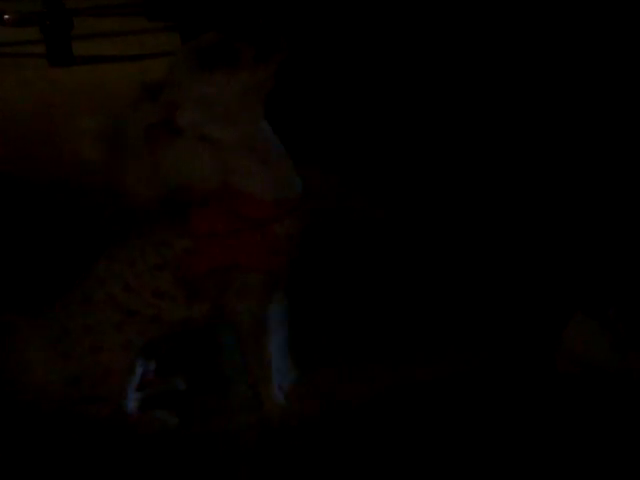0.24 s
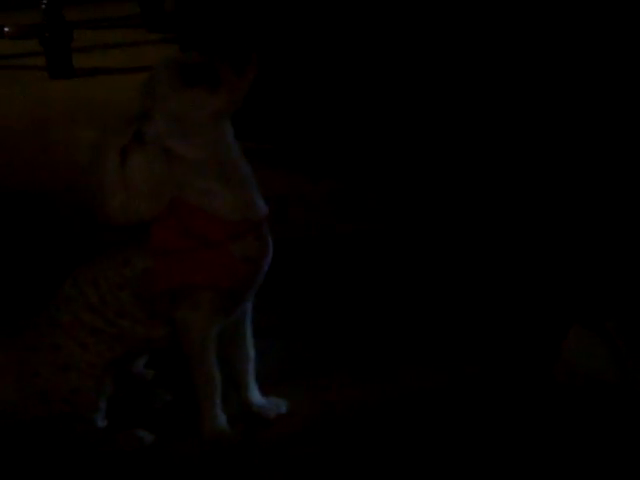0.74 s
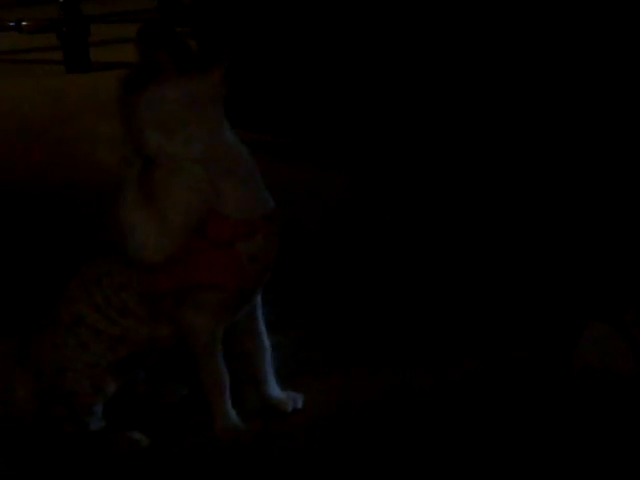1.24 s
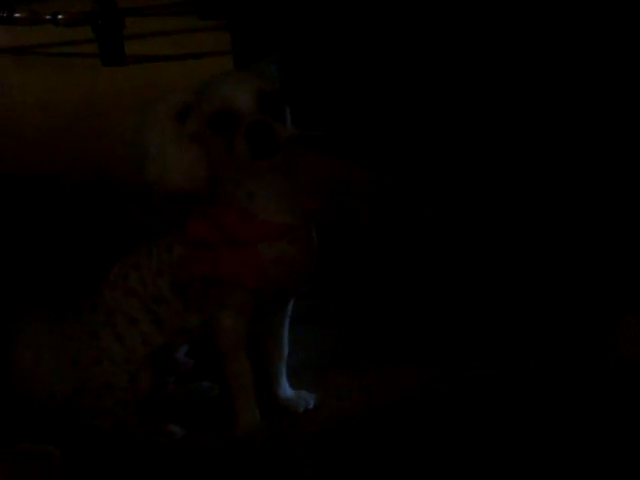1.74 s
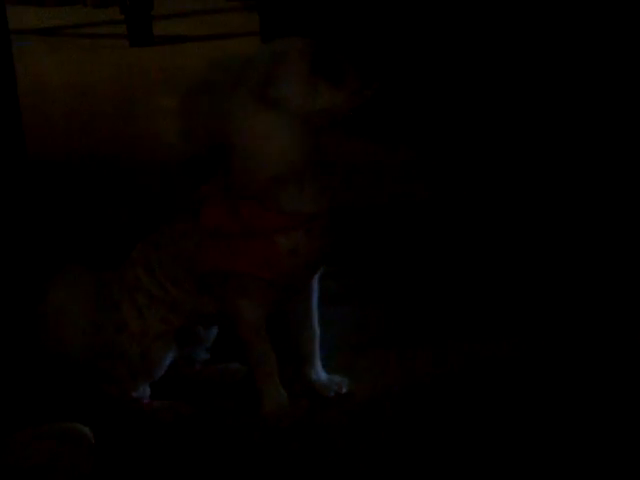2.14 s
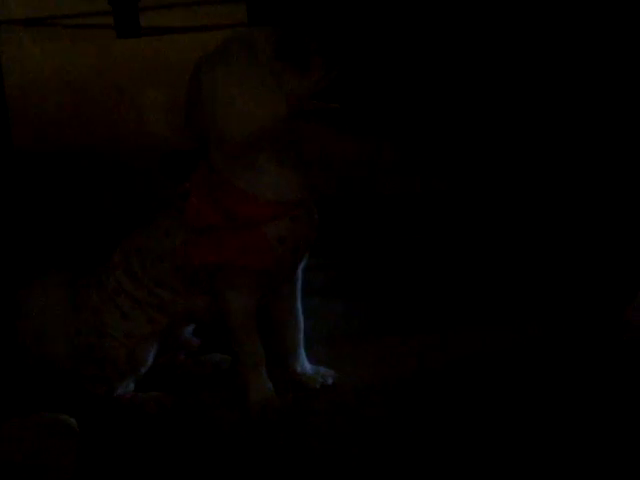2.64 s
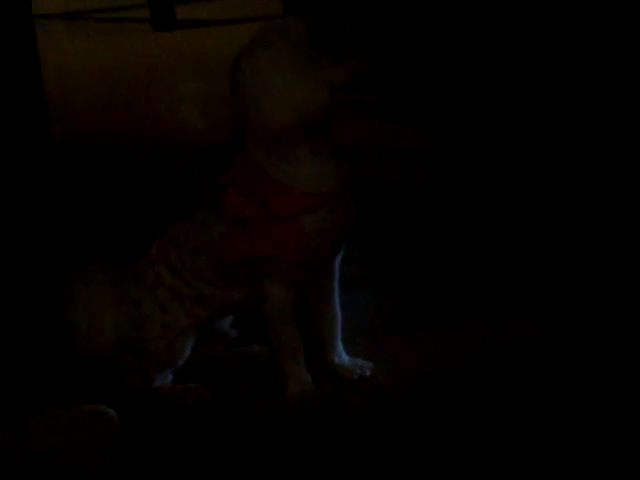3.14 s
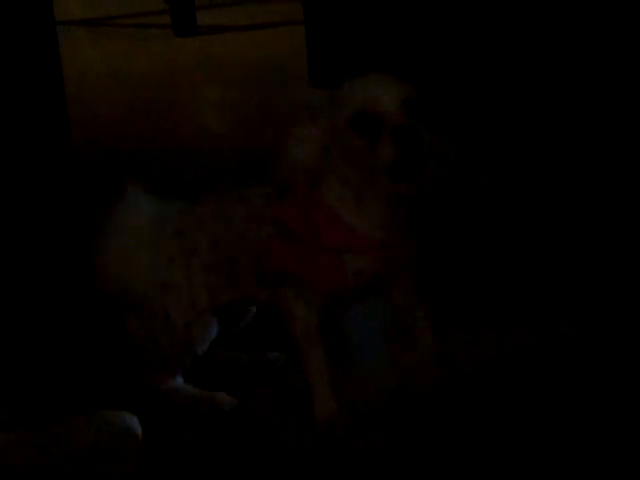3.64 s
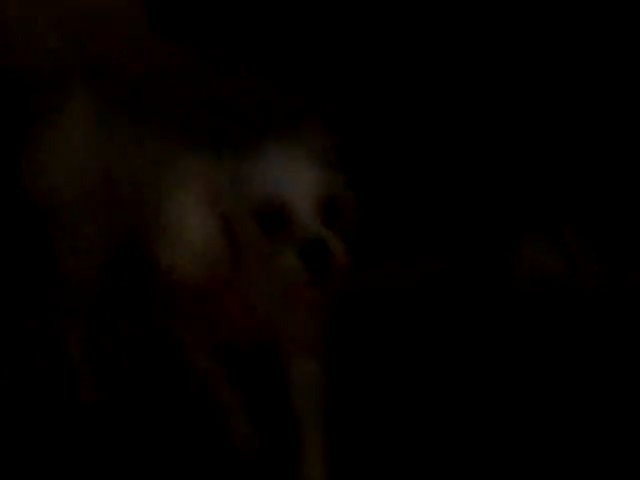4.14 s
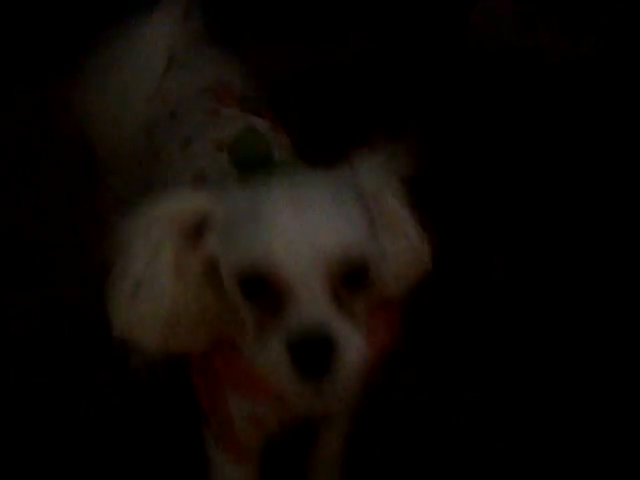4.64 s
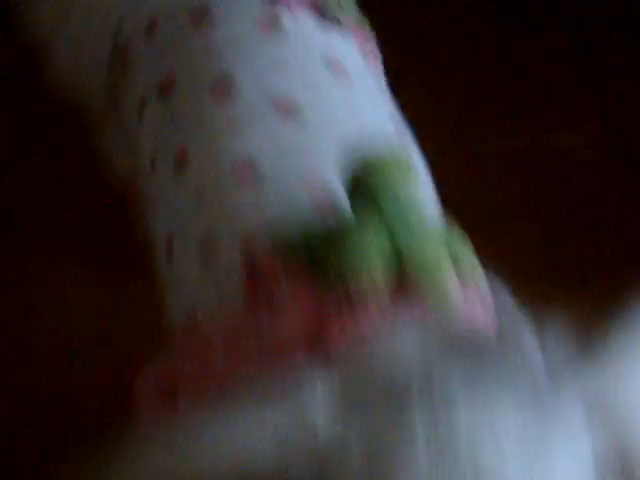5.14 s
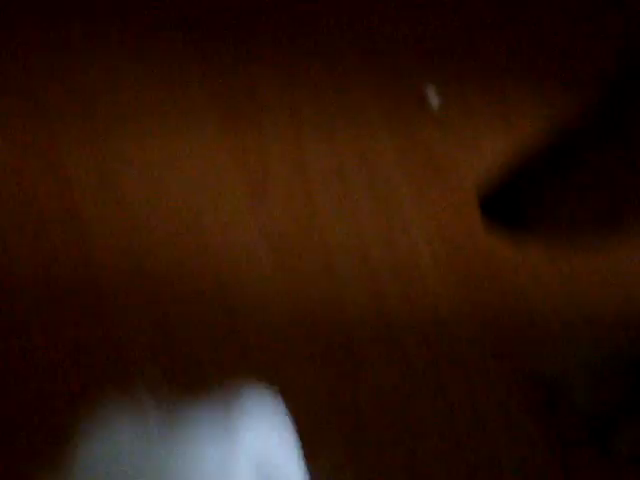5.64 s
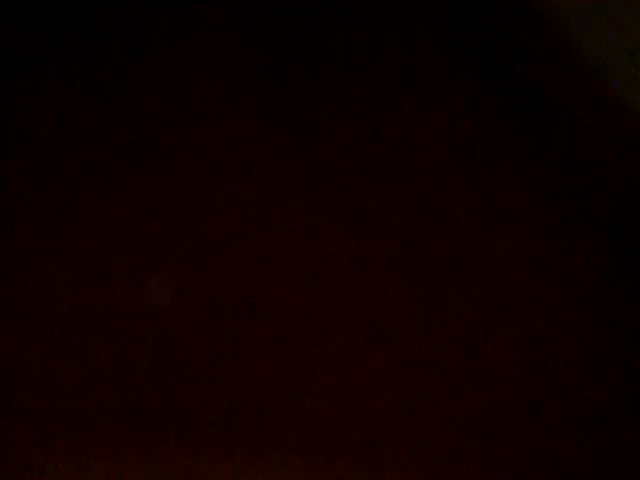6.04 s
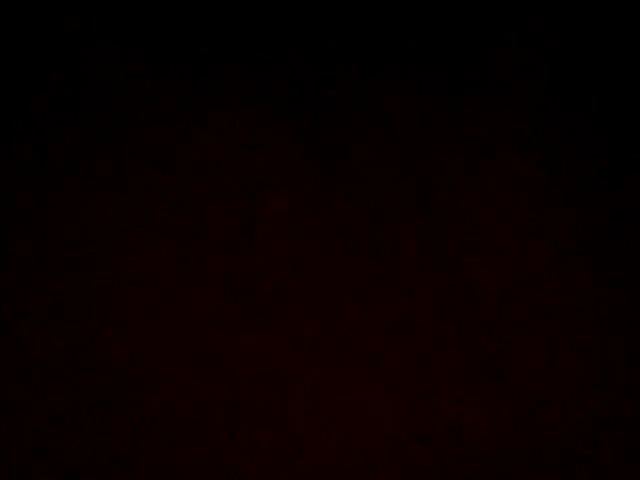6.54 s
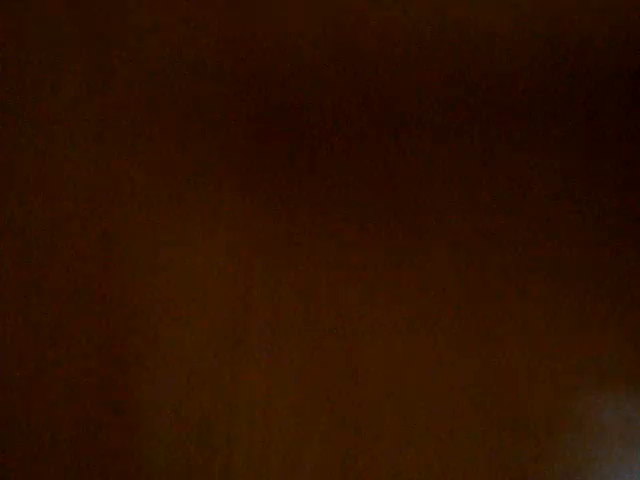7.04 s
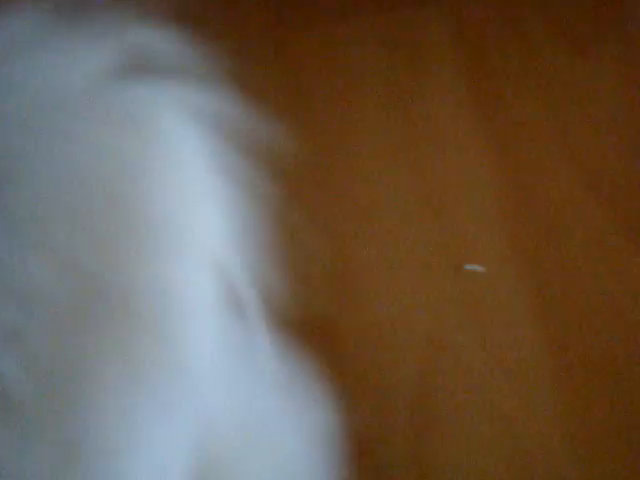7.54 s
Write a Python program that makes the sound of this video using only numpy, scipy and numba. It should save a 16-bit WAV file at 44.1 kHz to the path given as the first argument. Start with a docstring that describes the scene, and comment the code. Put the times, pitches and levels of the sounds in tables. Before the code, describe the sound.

A small dog gives sharp high yips and thin whines in an echoing hard-floored room, then trots close, claws clicking, panting lightly.

```python
"""A small dog yips and whines in a hard-floored room, then trots up to a phone, claws ticking, and pants.
Cries are gliding harmonics plus breath noise, at times period-doubled; claws are ringing spikes with a scuff.
Pants are puffs of shaped noise; decaying noise bands form the room's echo, over a murmur and a swelling rumble.
The phone's gain control ducks on loud cries and creeps back, so the room's murmur sinks and swells."""
import sys
import numpy as np
from scipy import signal
from scipy.fft import rfft, irfft, next_fast_len
from scipy.io import wavfile
from scipy.ndimage import uniform_filter1d, minimum_filter1d
from numba import njit

SR = 44100
rng = np.random.default_rng(int(sys.argv[2]) if len(sys.argv) > 2 else 0)


def generate_wav(sig):
    """Save sig (samples, or channels by samples) to the path in sys.argv[1] as 16-bit PCM at SR."""
    pcm = np.round(np.clip(np.atleast_2d(sig).T, -1, 1) * 32767).astype(np.int16)
    wavfile.write(sys.argv[1], SR, pcm)


N = 343965
LEAD = int(.4 * SR)  # samples ahead of the start, so that an earlier note can still echo
MIC_TOP_HZ = 10000


def undb(db):
    """Decibels to amplitude gain."""
    return 10 ** (np.asarray(db) / 20)


def at(points, hz):
    """Interpolate (f/Hz, value) points on a log-frequency axis."""
    f, v = np.transpose(points)
    return np.interp(np.log(np.maximum(hz, 1)), np.log(f), v)


def noise(n, points, slope_db=0):
    """Noise of rms 1 coloured by (f/Hz, level/dB) points, tilted by slope_db per octave about 2 kHz."""
    m = next_fast_len(n)
    hz = np.arange(m // 2 + 1) * SR / m
    colour_db = at(points, hz) + slope_db * np.log2((hz + 50) / 2000)
    x = irfft(rfft(rng.standard_normal(m)) * undb(colour_db), m)[:n]
    return x / np.std(x)


def add(track, s, x):
    """Mix x into the track from time s on."""
    i = LEAD + int(s * SR)
    track[i:i + len(x)] += x[:len(track) - i]


def murmur():
    """Steady house noise with a fixed spectrum."""
    # spectrum: f/Hz, density/dB (relative)
    spectrum = [(24, -40), (40, -12.5), (124, -11.5), (254, 3), (597, -0.5), (670, 1.5), (3300, -16.5),
                (4350, -12), (8910, -23.5), (10000, -26), (13000, -49), (22000, -120)]
    return undb(-49.5) * noise(N, spectrum)


def rumble():
    """Low noise that swells for a while."""
    # spectrum: f/Hz, level/dB (relative)
    spectrum = [(20, -12), (60, -7), (110, -17.5), (175, 8), (260, -9.5), (500, -27.5)]
    # swell: t/s, level/dB
    swell = [(0, -77), (2.3, -71), (2.702, -61.5), (3.5, -60), (4.2, -64), (4.599, -80), (7.8, -68)]
    level_db = np.interp(np.arange(N) / SR, *np.transpose(swell))
    return undb(level_db) * noise(N, spectrum)


def room(x):
    """Echoes that arrive after a gap, thicken, and die band by band."""
    # decay time to -60 dB: f/Hz, T60/s
    decay = [(250, 0.13), (700, 0.37), (1300, 0.36), (3000, 0.27), (6000, 0.37), (10000, 0.38)]
    gap_s, build_s = 0.0038, 0.029
    early_db, early_s = 4, .03  # first reflections stand above the later tail
    t = np.arange(int(.7 * SR)) / SR
    tail = 0
    for hz in 160 * 2. ** np.arange(7):
        band = noise(len(t), [(hz / 2, -40), (hz / 1.47, 0), (hz * 1.2, 0), (hz * 2, -40)])
        tail = tail + band * np.sqrt(hz) * undb(-60 * t / at(decay, hz))
    build = np.clip((t - gap_s) / build_s, 0, 1)
    tail = tail * build * undb(early_db * np.exp(-(t / early_s) ** 2))
    tail = tail / np.sqrt(np.sum(tail ** 2))
    return signal.fftconvolve(x, tail)[:len(x)]


def pant(db, length_s, slope_db):
    """A puff of air through the open mouth: noise under a Gaussian envelope."""
    # mouth colour: f/Hz, level/dB
    mouth_colour = [(300, -16.5), (1000, 11.5), (2000, 2.5), (3500, -2.5), (6000, -7), (10000, -19)]
    t = np.arange(-length_s, length_s, 1 / SR)
    return undb(db) * np.exp(-(2 * t / length_s) ** 2) * noise(len(t), mouth_colour, slope_db)


def claw(db, hz):
    """A nail's tick: a sharp spike that rings at its centre, with a short broad scuff."""
    spike_t60_s, scuff_t60_s, scuff_attack_s = 0.00072, 0.037, 0.0001
    t = np.arange(int(.06 * SR)) / SR
    spike = np.sin(2 * np.pi * hz * t) * undb(-60 * t / spike_t60_s)
    scuff = noise(len(t), [(hz / 8, -25), (hz / 2, -6), (hz, 0), (hz * 2, -6), (hz * 8, -15)])
    scuff = scuff * undb(-60 * t / scuff_t60_s) * np.minimum(t / scuff_attack_s, 1)
    return undb(db) * (spike + 0.43 * scuff)


def note(rows, attack_s, mouth, slope_db, breath_from_db, breath_to_db, half_from_db, half_to_db, buzz_db):
    """Vocal-fold harmonics and sub-lines through throat and nose; the breathier, the more lines tremble."""
    # mouth open: f/Hz, level/dB
    throat = [(200, -23), (500, -21), (1300, 5), (1900, -4.5), (2300, -4.5), (3000, 4), (3600, -4.5),
              (4200, 1.5), (4800, -14), (7000, -28), (9700, -32.5)]
    # mouth shut: f/Hz, level/dB
    nose = [(200, -20), (500, 0), (1250, 2), (1750, -13), (2400, -27), (3000, -9), (3700, -15), (4600, -30),
            (5400, -21), (6100, -32), (7500, -9), (8600, -17), (10000, -16)]
    # breath colour: f/Hz, level/dB
    breath_colour = [(300, -56.5), (800, -19.5), (1300, -4.5), (2200, -5.5), (3100, -0.5), (4200, -8.5),
                     (5000, -18), (7000, -11), (10000, -10)]
    wobble = [(20, -3.5), (200, 4.5), (600, -36.5)]  # spectrum of jitter and shimmer: f/Hz, level/dB
    jitter, shimmer = 0.064, 0.4  # pitch and level tremble per unit of breath gain
    attack_from_db, edge_s = -24, 0.002  # attack starts below the first level; fade at both ends
    strain_slope_db, strain_breath_db = 14.5, 8  # what full strain adds: dB per octave, dB
    rasp_db, rasp_s = 8, .015  # the folds leak air until they settle
    under_db = -18  # the open mouth radiates little below the pitch

    s, *columns = np.transpose(rows)
    t = np.arange(s[0] - attack_s, s[-1], 1 / SR)
    n = len(t)
    hz, db, strain = (np.interp(t, s, c) for c in columns)
    db = db + attack_from_db * np.maximum(s[0] - t, 0) / attack_s
    slope_db = slope_db + strain_slope_db * strain
    breath_db = np.linspace(breath_from_db, breath_to_db, n) + strain_breath_db * strain
    breath_db = breath_db + rasp_db * np.exp(-(t - t[0]) / rasp_s)
    breath_gain = undb(breath_db)
    half_db = np.linspace(half_from_db, half_to_db, n)
    mouth = np.clip(mouth, 0, 1)
    quarter_db = -9 - 50 * (1 - mouth)  # whines with the mouth shut run more evenly
    buzz = undb(buzz_db + db - np.max(db))  # the snap fades faster than the cry as it grows quieter

    phase = 2 * np.pi * np.cumsum(hz * (1 + (.004 + jitter * breath_gain) * noise(n, wobble))) / SR
    voice = 0
    for k in np.arange(.5, 18, .25):  # multiples of the pitch
        folds = undb(slope_db * np.log2(max(k, 1))) + buzz
        tract_db = mouth * at(throat, k * hz) + (1 - mouth) * at(nose, k * hz)
        # every second and fourth cycle differs a little
        sub_db = (half_db if k % 1 else 0) + (quarter_db if k % .5 else 0) + (under_db if k < 1 else 0)
        line = folds * undb(tract_db + sub_db) * (k * hz < MIC_TOP_HZ)
        if np.max(line) > undb(-66):  # skip faint lines
            tremble = 1 + shimmer * breath_gain * min(k - 1 + 0.067, 2) * noise(n, wobble)
            voice = voice + line * tremble * np.sqrt(2) * np.sin(k * phase + k * k)
    breath = breath_gain * (1 + .5 * np.cos(phase)) * noise(n, breath_colour)  # pulses with the folds
    edge = np.clip(np.minimum(t - t[0], s[-1] - t) / edge_s, 0, 1)
    no_bass = signal.butter(4, .45 * np.min(hz), "high", fs=SR, output="sos")  # a small head radiates none
    return signal.sosfilt(no_bass, undb(db) * edge * (voice + breath))


def scene():
    """Cries, claws and pants, direct and through the room, over murmur and rumble."""
    # panted breaths: middle t/s, level/dB, length/s, brightness/dB per octave
    pants = [(1.211, -45.5, 0.038, 3.5), (3.432, -39.5, 0.053, 0), (4.483, -35.5, 0.029, 12),
             (4.617, -37, 0.11, 7.5), (5.572, -48, 0.041, -4), (5.826, -45.5, 0.14, 9),
             (6.004, -41.5, 0.058, 4.5), (6.362, -38.5, 0.035, 6), (6.514, -45, 0.037, 2.5),
             (6.652, -41.5, 0.028, 2), (6.784, -33, .04, 15), (6.947, -41.5, 0.03, 7)]
    # claws on the floor: t/s, level/dB, centre f/Hz
    claws = [(4.2964, -25.5, 2850), (4.4627, -22.5, 2800), (4.79, -20.5, 4440), (4.952, -22.5, 2630),
             (5.0585, -29.5, 1990), (5.1176, -21, 1950), (5.2757, -19, 2410), (5.4477, -20, 1740),
             (5.566, -31.5, 1830), (5.728, -36, 1850), (5.9661, -19, 5230), (6.082, -35, 5040),
             (6.2242, -33, 1780), (6.2945, -41, 1970), (6.736, -31.5, 6370), (6.8473, -23.5, 1930),
             (6.926, -30, 1460), (7.028, -34, 1900), (7.065, -32, 8100), (7.16, -35.5, 2050),
             (7.2, -33, 1690), (7.56, -44, 4820), (7.7112, -33.5, 1560)]
    # room's share of a tick, which dips sharply around 6 s: t/s, level/dB
    claw_room = [(4.3, -9.5), (5.7, -4), (6, -34), (7.7, -5)]
    # one curve a note; a cry that leaps in pitch or turns to a whine takes several:
    # t/s, pitch f/Hz, level/dB, strain 0-1 (brightens overtones, lets breath through)
    notes = [
        [(-.3, 1240, -33, .3), (-.25, 1257, 3, .3)],
        [(.265, 852.3, -6, 0.84), (.277, 956.4, -3, 0.93), (.287, 1065, -5, 1), (.295, 1163, 4.5, 0.15),
         (.303, 1316, 4, 0.61), (.323, 1259, -5, 0.34), (.338, 1100, -12, 1), (.385, 793, -11, 0),
         (.42, 581, -14.5, 0)],
        [(1.263, 1023, -13, 0.99), (1.27, 1051, 2.5, 0.78), (1.279, 1050, -2, 0.94), (1.286, 1168, 1, 0.6),
         (1.32, 1195, 13.5, 0.2), (1.365, 1216, 10, 0.3)],
        [(1.368, 1484, -2.5, 0.4), (1.385, 1489, 0.5, 0.76), (1.41, 1438, 0.5, 0), (1.425, 1449, 3.5, 0),
         (1.45, 1234, -7.5, 0)],
        [(2.196, 1320, -14.5, 0), (2.204, 1324, -3.5, 0), (2.217, 1304, -6.5, .4), (2.226, 1222, -7.5, 0.76),
         (2.245, 1262, -15, 1), (2.262, 1107, -25, 0.04)],
        [(3.455, 1916, 0.5, 0.36), (3.468, 1774, -9.5, 0.55), (3.488, 1878, -3.5, .15),
         (3.496, 1783, -5.5, 0.37), (3.501, 1258, -17.5, 0), (3.515, 1134, -25, 0.3)],
        [(3.728, 1104, -10.5, 0.4), (3.745, 1219, -9, 0.42), (3.76, 1302, -7.5, 0.91)],
        [(3.763, 1870, -8, .3), (3.77, 2013, -11.5, 0.5), (3.78, 2042, -7, 0.7), (3.8, 1620, -13.5, 0.8),
         (3.82, 1513, -13.5, 0), (3.86, 1320, -22, 0)],
        [(3.858, 1335, -14.5, 0.9), (3.91, 1327, -22.5, .4), (3.95, 1398, -14.5, 1), (4.01, 1449, -13, 0.2),
         (4.07, 1435, -14.5, 0), (4.1, 1407, -16, 0), (4.13, 1415, -12, 0), (4.16, 1386, -13.5, .2),
         (4.195, 1370, -27.5, 0.6), (4.212, 1240, -21, 1)],
        [(4.485, 904, -14, 1), (4.491, 962, -21.5, 1), (4.494, 1064, -5.5, 0.3), (4.519, 1068, -11, 0),
         (4.526, 958, -22, 0.32), (4.555, 949, -20.5, .4), (4.58, 864, -24, 0)],
        [(5.071, 664, -38, .4), (5.08, 596, -34.5, .3), (5.092, 580, -32, .5)],
        [(5.17, 694, -11.5, 0.52), (5.184, 642, -11.5, .4), (5.198, 862, -22, 0), (5.215, 813, -20.5, 0),
         (5.24, 620, -32.5, 0.5)],
        [(7.262, 577.4, -18.5, 0.46), (7.274, 537, -16.5, 0.48), (7.286, 598, -16.5, 0.5),
         (7.302, 605.5, -22.5, .9), (7.345, 563, -17, 0.3), (7.39, 495.3, -24, 0.46), (7.408, 507, -23.5, 0.16),
         (7.43, 524.5, -23, 0.2), (7.452, 606, -20, 0), (7.47, 617, -60, 0.4)],
        [(7.76, 560, -27.5, 0), (7.8, 536, -50, 0.1)],
    ]
    # voice of each note, relaxed, dB re its level: attack/s, mouth open 0-1, overtone slope/dB per octave,
    # breath at start/dB, at end/dB, half-pitch lines at start/dB, at end/dB,
    # flat overtone shelf from the folds snapping shut/dB, room's share/dB
    voices = [(0.0071, 1, -9.5, -24, -23, -35, -42, -44.5, 9),
              (.007, 1, -11.5, -20, -9, -18.5, -18, -41, -5.5),
              (0.004, 0.99, -12.5, -23.5, -16.5, -13.5, -2.5, -34, -4.5),
              (.003, 1, -16.5, -7.5, -21.5, 10.5, -1, -21, -6.5),
              (0.015, 0.87, -23.5, -36, -30.5, -40, -48, -15.5, -7),
              (.005, 0.86, -14, -37.5, -32.5, -49, -41.5, -34, -2),
              (.004, 1, -10, -29, -25.5, -33, -26, -32, -1), (.003, 0.96, -9, -30, -20, -22, -29, -23, -2),
              (.003, .4, -55, -34, -34.5, -41, -45, -15, -7),
              (.004, 1, -18.5, -25, -25.5, -41, -48, -14, -3),
              (0.00296, .05, -42, -46, -45.5, -29, -29.5, -55, -8.5),
              (0.014, 0.33, -18, -37, -32, -28, -40, -53, -9.5),
              (0.012, .05, -14, -25.5, -55, -22.5, -48, -26.5, -16),
              (.015, 0.043, -68, -48, -50, 17, 23, -60, -12)]

    near, walls = np.zeros(N + LEAD), np.zeros(N + LEAD)
    for s, db, length_s, slope_db in pants:
        x = pant(db, length_s, slope_db)
        add(near, s - length_s, x)
        add(walls, s - length_s, x * undb(-18.0))
    for s, db, hz in claws:
        x = claw(db, hz)
        add(near, s, x)
        add(walls, s, x * undb(np.interp(s, *np.transpose(claw_room))))
    for rows, (attack_s, *voice, room_db) in zip(notes, voices):
        x = note(rows, attack_s, *voice)
        start_s = rows[0][0] - attack_s
        add(near, start_s, x)
        add(walls, start_s, x * undb(room_db))
    dog = (near + room(walls))[LEAD:]
    return (dog + murmur() + rumble())[None]


@njit
def ride(x, ceiling, gain, attack, hold, recover):
    """Gain control: falls fast while peaks pass the ceiling, waits, then climbs at a steady dB rate up to 1."""
    out, wait = np.empty(len(x)), hold
    for i in range(len(x)):
        out[i], peak = gain, abs(gain * x[i])
        if peak > ceiling:
            gain -= attack * gain * (1 - ceiling / peak)
            wait = hold
        elif wait > 0:
            wait -= 1
        else:
            gain = min(gain * recover, 1.)
    return out


def record(dry):
    """Gain control, converter hiss, the microphone's top, overload on the sharpest peaks, then a final low-pass."""
    ceiling, overload = .52, .71  # re full scale
    start_gain_db, attack_s, hold_s, recover_db_s = -19.5, .0006, 0.18, 24
    top_hz = 16000
    gain = ride(dry[0], ceiling, float(undb(start_gain_db)), 1 / (attack_s * SR), hold_s * SR,
                float(undb(recover_db_s / SR)))
    # centred windows: the gain starts down ahead of a peak
    gain = uniform_filter1d(minimum_filter1d(gain, size=200), size=200)
    hiss = undb(-58.5) * noise(N, [(300, 0.5), (1200, 5.5), (10000, -0.5)])
    x = dry[0] * gain + hiss
    x = signal.sosfilt(signal.ellip(10, .3, 60, MIC_TOP_HZ, fs=SR, output="sos"), x)
    x = np.clip(x, -overload, overload)
    return signal.sosfilt(signal.ellip(10, .2, 80, top_hz, fs=SR, output="sos"), x)[None]


dry = scene()
out = record(dry)
generate_wav(out)
```